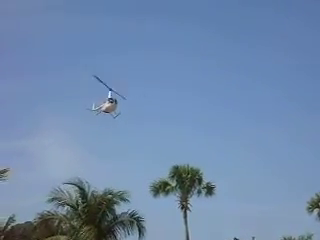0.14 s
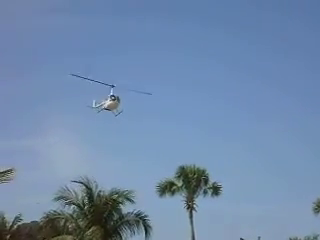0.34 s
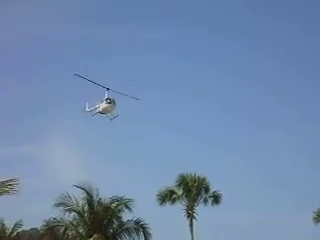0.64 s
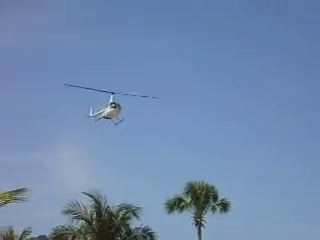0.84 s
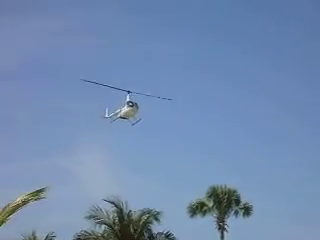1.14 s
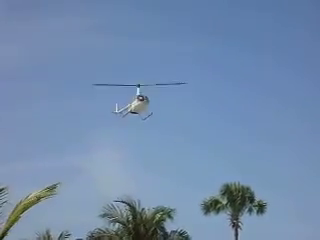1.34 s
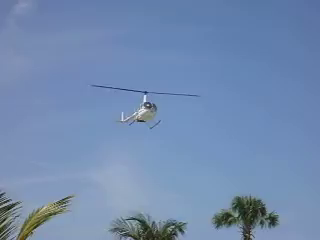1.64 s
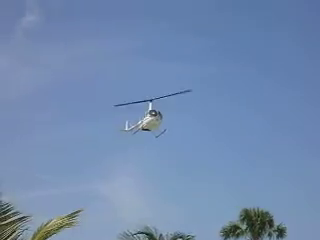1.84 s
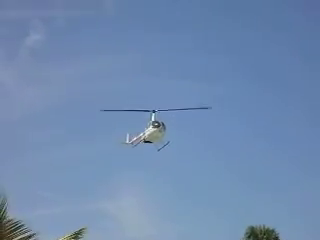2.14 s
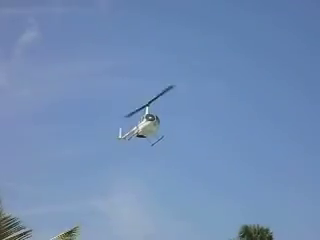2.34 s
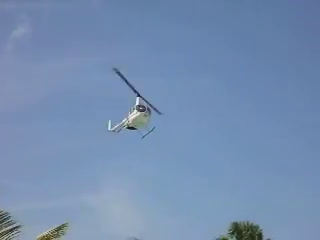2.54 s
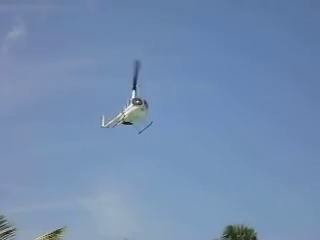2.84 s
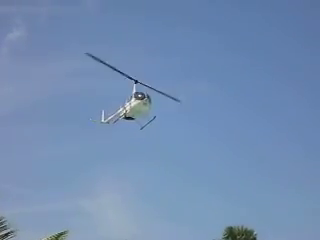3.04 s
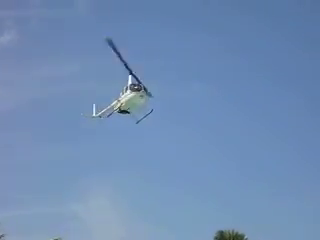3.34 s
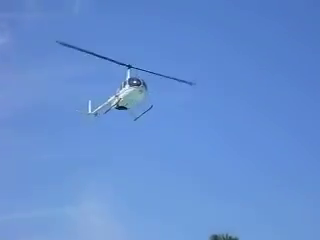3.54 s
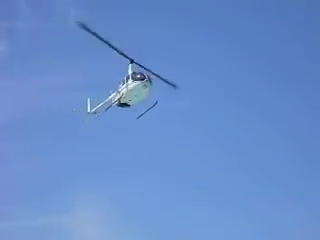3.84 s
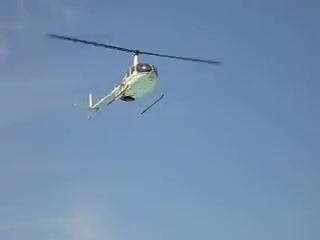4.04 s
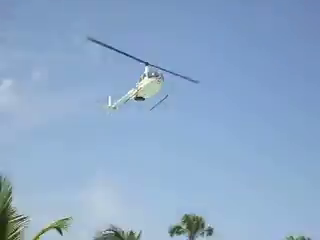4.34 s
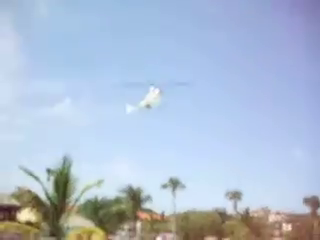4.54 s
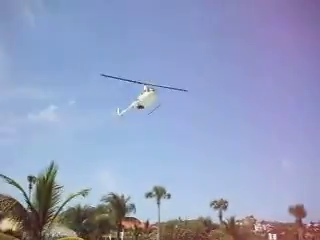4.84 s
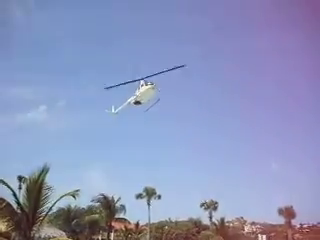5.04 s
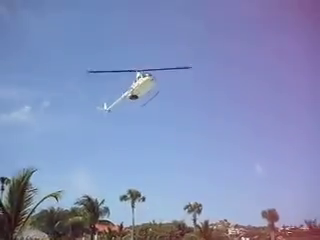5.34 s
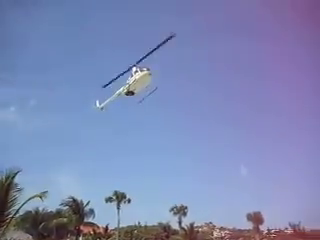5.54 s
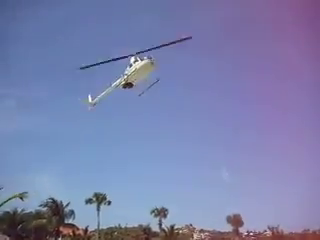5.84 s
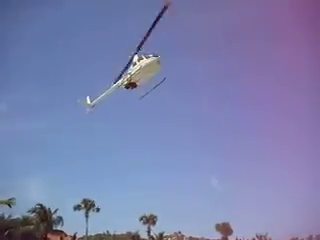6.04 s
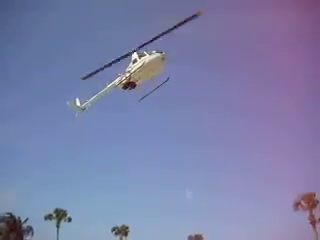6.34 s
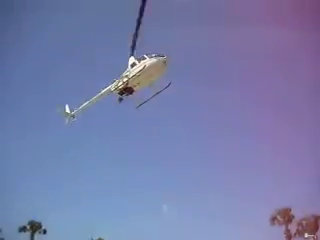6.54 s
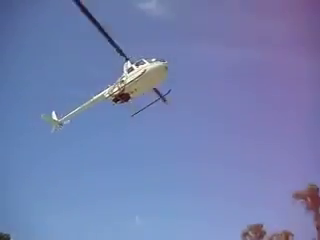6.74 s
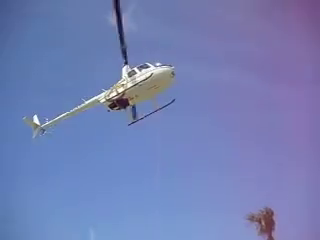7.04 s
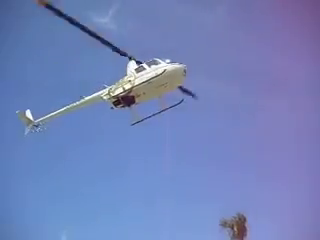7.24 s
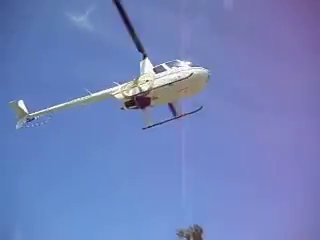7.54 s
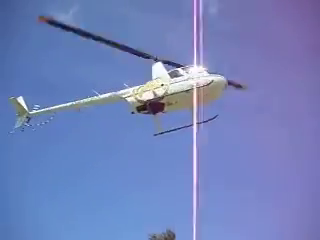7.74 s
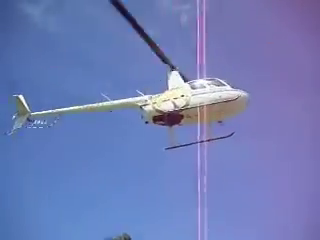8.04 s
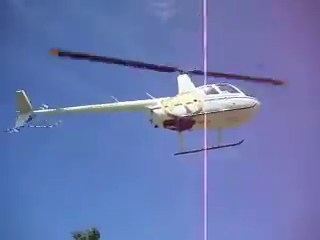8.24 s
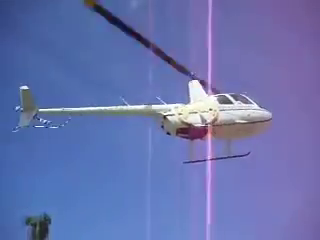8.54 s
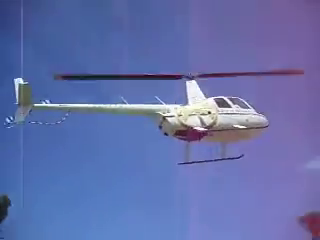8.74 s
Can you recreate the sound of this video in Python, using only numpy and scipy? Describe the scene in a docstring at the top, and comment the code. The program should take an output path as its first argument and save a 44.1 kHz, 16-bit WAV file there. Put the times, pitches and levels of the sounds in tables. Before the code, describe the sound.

A small piston helicopter with a two-blade rotor approaches outdoors. From 0 to 4.2 seconds it is distant: sharp, hollow slaps at a steady fourteen a second, swelling and fading in irregular bursts, each with a short hiss and low thud, over faint wash and tail buzz. Slaps strengthen around 3.3 and 4 seconds, with isolated crackles. From 4.2 to 4.9 there is complete silence. The chop then returns, lower and longer, peaking near 5.4 seconds. From 6 seconds the engine drone near 140 hertz and its octave emerge, sinking slightly, with a raspy tail-rotor buzz and broad rushing wash. From about 6.9 to 8.9 it is loud and overhead: heaving low air, rough swishes, a faint fuzzy gear whine, and frequent brittle crackles as the narrow-band recorder overloads. It ends at full strength, still chopping.

```python
"""A small piston helicopter with a two-blade rotor flies in from far off until it is low overhead.
At a distance each blade slaps the vortices left by the other, in bursts of swings that swell and fade.
At some moments the recorder overloads and crackles; then comes a short silent break.
After it the engine's drone (a firing tone and its octave), the tail rotor's buzz of harmonics and the
noise of the rotor wash grow as the distance shrinks, with more and more crackles."""
import sys
import numpy as np
from scipy.fft import rfft, irfft, next_fast_len
from scipy.io import wavfile
from scipy.ndimage import uniform_filter1d, map_coordinates

SR = 44100
rng = np.random.default_rng(int(sys.argv[2]) if len(sys.argv) > 2 else 0)


def wav_record(signal):
    """Record a signal, one row per channel, as 16-bit PCM in the file named by sys.argv[1]."""
    frames = np.transpose(np.atleast_2d(signal))
    bounded = np.clip(frames, -1, 1)
    # unit amplitude maps onto the largest positive 16-bit level
    quanta = np.round(bounded * 32767).astype(np.int16)
    wavfile.write(sys.argv[1], SR, quanta)


N = 392049

# firing rate of all the cylinders together, sinking as the approach slows: time_s, firing_hz
FIRING_RATE = [(0, 142.7), (4.2, 142.8), (4.9, 141.3), (5.8, 139.4), (6.4, 140.9), (7, 139), (7.5, 138),
               (8, 137.7), (8.89, 137.3)]
CYLINDERS = 6


def amp(db):
    """Decibels to gain."""
    return 10 ** (np.asarray(db) / 20)


def unit(x):
    """x at rms 1."""
    return x / np.sqrt(np.mean(x ** 2) + 1e-20)


def along(points, hz):
    """(Hz, value) points read on a log axis."""
    f, v = np.transpose(points)
    return np.interp(np.log(hz + 1), np.log(f + 1), v)


def curves(rows):
    """One value per sample for each column after the time."""
    s, *cols = np.transpose(rows)
    return [np.interp(np.arange(N) / SR, s, c) for c in cols]


def wobble(rate):
    """A smooth random curve, rate knots a second."""
    knots = rng.standard_normal(int(N * rate / SR) + 4)
    steps = np.arange(0, N, 64)
    coarse = map_coordinates(knots, [steps * rate / SR])
    return np.interp(np.arange(N), steps, coarse)


def filtered(x, response):
    """x times a response of frequency."""
    m = next_fast_len(N + SR // 4)
    return irfft(rfft(x, m) * response(np.fft.rfftfreq(m, 1 / SR)), m)[:N]


def coloured(x, spectrum):
    """x through a (Hz, dB) spectrum."""
    return filtered(x, lambda hz: amp(along(spectrum, hz)))


def noise(spectrum):
    """Noise of rms 1 with the given spectrum."""
    return unit(coloured(rng.standard_normal(N), spectrum))


def around(s, count=2000):
    """Sample indices near a moment, and their times from it."""
    i = np.arange(max(round(s * SR) - count, 0), min(round(s * SR) + count, N))
    return i, i / SR - s


def periodic(turns, orders, gains, size=4096):
    """A wave of rms 1 made of the given multiples of a rotation."""
    angle = np.linspace(0, 2 * np.pi, size + 1)
    phases = rng.uniform(0, 2 * np.pi, (len(orders), 1))
    cycle = gains @ np.sin(np.outer(orders, angle) + phases)
    return np.interp(turns % 1 * 2 * np.pi, angle, unit(cycle))


def over_ground(x, lag, share):
    """The ground returns a later copy, whose lag grows as the helicopter climbs the sky."""
    n = np.arange(N)
    return (x + share * np.interp(n - lag * SR, n, x)) / np.sqrt(1 + share ** 2)


def wash_levels(nearest_m=15.28, rumble_db=-21.5, rush_db=-21.5, hiss_db=-29.5, air_db_per_m=.009):
    """Rumble, rush and hiss (dB) fall with distance, the hiss a little faster as the air absorbs it."""
    # the approach towards the microphone: time_s, distance_m
    distance = [(0.2, 210), (1.2, 147), (2.1, 162), (2.9, 116), (4.1, 83), (5.0, 61.5), (6.1, 43.5),
                (6.6, 41), (7.0, 29.2), (7.5, 24), (7.9, 20.6), (8.8, 15.8)]
    metres, = curves(distance)
    spread_db = -20 * np.log10(metres / nearest_m)
    return rumble_db + spread_db, rush_db + spread_db, hiss_db + spread_db - air_db_per_m * metres


def washes(rumble_db, rush_db, hiss_db, heave_db, puffs):
    """The wash is turbulent noise in three bands, and exhaust puffs ripple through the upper two."""
    # spectra of the low, middle and high wash: freq_hz, relative_level_db
    low_wash = [(15, -25.5), (50, -25.5), (90, -20), (170, -13.5), (240, -5.5), (330, -6), (430, -6),
                (600, -28), (1200, -58), (3000, -120)]
    middle_wash = [(100, -55), (330, -15), (500, -0.5), (680, 2.5), (850, -5.5), (1150, -5.5), (1450, -17),
                   (2200, -32), (6000, -79), (8000, -120)]
    high_wash = [(400, -51), (1400, -10), (1950, 0.5), (2250, -3), (2650, -2.5), (2870, -4), (3300, -8),
                 (3800, -6.5), (5000, -10.5), (6800, -19), (7600, -27), (8150, -33.5), (8600, -78)]
    rumble = amp(heave_db + rumble_db + 1.6 * wobble(8)) * noise(low_wash)
    rush = amp(heave_db + rush_db + 2.3 * wobble(30) + 2.7 * puffs) * noise(middle_wash)
    hiss = amp(hiss_db + 1.7 * wobble(110) + 1.6 * puffs) * noise(high_wash)
    return rumble + rush + hiss


def engine(cycles, overhead, rumble_db, rush_db, firing_gain_db=1.05, octave_gain_db=-2, count=100):
    """Six firings a cycle give the drone; unequal cylinders fill in the other orders."""
    # the exhaust turning towards the listener, ahead of the two gains:
    # time_s, firing_tone_db, octave_db
    exhaust = [(0.2, -63.5, -46), (2, -56, -55), (4, -48.5, -37.5), (5, -44.5, -52.5), (5.5, -35, -49),
               (6.1, -33.5, -44), (6.5, -32, -31.5), (7.3, -27.5, -23), (8, -24.5, -23),
               (8.8, -26.5, -20.5)]
    # colour of the exhaust pipe: freq_hz, relative_level_db
    pipe_colour = [(23, -36), (70, -1.5), (115, -4), (200, -3), (320, 3.5), (460, -7.5), (650, 2.5),
                   (900, -8), (1300, -5.5), (2400, -31.5)]
    # engine orders that stand out: multiple_of_cycle_rate, relative_level_db
    strong_orders = [(14, -7), (18, -5), (27, -5), (29, 2), (33, -6), (37, -6), (39, -5), (47, -11)]
    firing_db, octave_db = curves(exhaust)
    angle = 2 * np.pi * CYLINDERS * cycles
    firing = amp(firing_db + firing_gain_db + wobble(13)) * np.sin(angle)
    octave = amp(octave_db + octave_gain_db + 0.48 * wobble(12)) * np.sin(2 * angle)
    drone = np.sqrt(2) * (firing + octave)

    shaded = 1 - overhead  # the exhaust points away during the approach
    orders = np.arange(1, count)
    last_cycle_hz = FIRING_RATE[-1][1] / CYLINDERS
    uneven = periodic(cycles + 0.0013 * wobble(25), orders, amp(along(pipe_colour, orders * last_cycle_hz)))
    strong, strong_db = np.transpose(strong_orders)
    growl = periodic(cycles + .0015 * wobble(12), strong, amp(strong_db))
    # both follow the distance of the wash
    uneven_db = rumble_db - 4 - 10 * shaded + 1.1 * wobble(7.7)
    growl_db = rush_db - 5.5 - 8 * shaded + wobble(5)
    return drone + amp(uneven_db) * uneven + amp(growl_db) * growl


def tail_rotor(cycles, overhead, rumble_db, gear=3.56, count=24):
    """The geared tail rotor buzzes in harmonics, most of all straight ahead."""
    # harmonics of the buzz, the first row the fundamental: nominal_hz, relative_level_db
    buzz_colour = [(85.5, -11), (170, -7.5), (255, -3.5), (340, -2.5), (425, -12.5), (510, -12.5),
                   (680, -10), (1000, -16), (2000, -34.5)]
    orders = np.arange(1, count)
    sway = .01 * wobble(6)
    gains = amp(along(buzz_colour, orders * buzz_colour[0][0]))
    buzz = periodic(gear * cycles + sway, orders, gains)
    return amp(rumble_db + 2.5 - 7.6 * overhead + wobble(2.6)) * buzz


def blade_passes(overhead, hit_window_s=.03, mismatch_db=.2, far_scatter=.45,
                 jitter_s=.0009, scatter_db=1.7, pitch_scatter=.12):
    """One row (s, slap dB, slap pitch Hz, swish dB) per blade pass, scattered more when overhead."""
    # the stretches in which the rotor is heard: first_pass_s, end_s
    stretches = [(0.047, 4.226), (4.901, 8.89)]
    # blade passes, slower by the end as the machine stops closing in: time_s, passes_per_s
    pass_rate = [(0, 14.195), (1.1, 14.226), (2.6, 14.247), (4.2, 14.23), (4.9, 14.32), (5.87, 14.12),
                 (6.85, 13.995), (7.8, 13.945), (8.89, 13.96)]
    # slapping that swells and fades as the rotor dips in and out of its own wake:
    # time_s, relative_slap_db
    slap_level = [(0.05, -29), (0.65, -22), (0.88, -31.5), (1.04, -19.5), (1.3, -30), (1.42, -17),
                  (1.68, -24), (1.98, -18.5), (2.22, -32), (2.38, -23), (2.62, -24.5), (3.35, -15),
                  (3.54, -19), (3.8, -19.5), (4.1, -15), (4.92, -24.5), (5.4, -12.5), (5.64, -33),
                  (5.88, -16), (6.14, -16), (6.32, -22.5), (6.62, -28.5), (6.8, -16), (7.05, -14.5),
                  (7.58, -22), (7.85, -16.5), (8.45, -15), (8.89, -20.5)]
    # how fast the blade crosses the row of vortices, before scatter: time_s, pitch_hz
    crossing_pitch = [(0, 632), (1.1, 688), (2.5, 608), (3.4, 566), (4.05, 634), (5.0, 581), (5.35, 404),
                      (6.6, 540), (7.3, 454), (8.89, 406)]
    # turbulence shed by the blades: time_s, relative_swish_db
    shed_level = [(0, -40.5), (0.55, -39), (0.95, -34), (1.15, -29.5), (1.7, -36), (2.6, -33), (3.4, -30.5),
                  (4.2, -31), (5.3, -30.5), (5.6, -27.5), (6.05, -30), (6.5, -25.5), (7.55, -28.5),
                  (7.85, -24.5), (8.89, -22.5)]
    # passes that hit a vortex squarely: time_s, extra_slap_db, extra_swish_db
    square_hits = [(0.4, 1, 0), (1.174, 2, 2.5), (1.876, 3, 4), (3.14, 2, -1.5), (3.91, 1.5, 1.5),
                   (5.887, 2, -1), (7.025, 0.5, 3)]
    t = np.arange(N) / SR
    sweep = np.cumsum(curves(pass_rate)[0]) / SR
    slap_db, pitch_hz, swish_db = curves(slap_level) + curves(crossing_pitch) + curves(shed_level)
    hits = np.array(square_hits)
    rows = []
    for first, end in stretches:
        first_turn, end_turn = np.interp([first, end], t, sweep)
        moments = np.interp(np.arange(first_turn, end_turn), sweep, t)
        for k, s in enumerate(moments):
            i = round(s * SR)
            scatter = np.interp(overhead[i], [0, 1], [far_scatter, 1])
            late, harder, higher, rougher = np.clip(rng.standard_normal(4), -2, 2) * scatter
            hit = np.abs(hits[:, 0] - s) < hit_window_s
            # one blade bites harder than the other
            bite_db, shed_db = hits[hit, 1:].sum(axis=0) + mismatch_db * (-1) ** k
            rows.append((s + jitter_s * late,
                         slap_db[i] + bite_db + scatter_db * harder,
                         pitch_hz[i] * np.exp(pitch_scatter * higher),
                         swish_db[i] + shed_db + scatter_db * rougher))
    return [row for row in rows if row[0] < t[-1]]


def slaps(passes, overhead, rise_far=0.00047, rise_near=0.0018, fall_far=0.0014, fall_near=0.0032,
          lead=0.001094, sag=0.17, skew=0.13, slap_db=-2.12, crack_db=30, count=24):
    """A blade cuts a row of tip vortices: a sharp suction, then a few swings; longer from below."""
    # colour of the swings: freq_hz, gain_db
    swing_colour = [(300, -0.5), (600, -1), (720, 2.5), (840, 3), (950, -6.5), (1150, 5.5), (1400, -3.5),
                    (2500, 1.5)]
    # colour of the crack: freq_hz, gain_db
    crack_colour = [(150, -12), (330, 12.5), (700, 0.5), (1100, 12), (1450, -9), (2000, -15.5), (3000, 0),
                    (5000, -5), (6800, -20), (7700, -32), (8500, -88.5)]
    swings, cracks = np.zeros(N), np.zeros(N)
    chance = rng.standard_normal((len(passes), count))
    for (s, db, hz, swish_db), spacing in zip(passes, chance):
        i, t = around(s - lead)
        steep = overhead[round(s * SR)]
        rise = rise_far + steep * (rise_near - rise_far)
        fall = fall_far + steep * (fall_near - fall_far)
        size = np.exp(-np.abs(np.where(t < 0, t / rise, t / fall / 2.2)) ** 2.2)
        # the vortices are unevenly spaced
        drift = np.interp(hz * t, np.arange(count) - count // 2, np.cumsum(spacing))
        uneven = (.34 + .6 * steep) * (drift - np.interp(0, t, drift))
        # older vortices lie further apart, so the swings slow down
        pitch = hz * (1 - sag * np.tanh((t - .0013) / 0.0012))
        turns = np.cumsum(pitch) / SR
        angle = 2 * np.pi * (turns - np.interp(0, t, turns)) + uneven
        slap = -size * (np.cos(angle) - skew * np.sin(2 * angle))
        swings[i] += amp(db + slap_db) * slap / np.sqrt(np.sum(slap ** 2) / (.02 * SR))
        # the first cut steepens into a crack
        cracks[round((s - lead) * SR)] -= amp(swish_db + crack_db - 11 * steep)
    return coloured(swings, swing_colour) + coloured(cracks, crack_colour)


def thuds(passes, overhead, far_hz=275, near_hz=215, width=.0032, delay=0.00091, thud_db=-2,
          thin_above_hz=600, thin_db_per_octave=20):
    """Under each slap the lift of the blade swings once: a low thud, thinner under fast, high slaps."""
    out = np.zeros(N)
    for s, db, slap_hz, _ in passes:
        i, t = around(s + delay)
        hz = far_hz + overhead[round(s * SR)] * (near_hz - far_hz)
        thin_db = thin_db_per_octave * max(np.log2(slap_hz / thin_above_hz), 0)
        swing = np.exp(-(t / width) ** 2) * np.cos(2 * np.pi * hz * t)
        out[i] += amp(db + thud_db - thin_db) * swing
    return out


def swishes(passes, overhead, far_db=3.2, near_db=-0.5, ragged_db=2.5):
    """Turbulence off each blade: a quick burst from afar, a slower swell from below."""
    # spectrum of the shed turbulence: freq_hz, relative_level_db
    swish_colour = [(300, -33), (900, 2), (1500, 1), (2000, 4), (2700, -2), (3400, -8), (5000, -11.5),
                    (6800, -21), (7600, -33.5), (8100, -35), (8500, -65)]
    level = np.zeros(N)
    for s, _, _, db in passes:
        i, t = around(s)
        steep = overhead[round(s * SR)]
        rise, fall = 0.0012 + 0.006 * steep, 0.0065 + 0.0003 * steep
        late = t - .0008
        shape = np.exp(-np.maximum(-late / rise, late / fall))
        level[i] += amp(db + far_db + steep * near_db) * shape
    return level * amp(ragged_db * overhead * wobble(260)) * noise(swish_colour)


def whumps(passes, overhead, width=0.0062, far_db=-16, near_db=1.8):
    """Each slap carries a gust of stirred air, fuller from below."""
    level = np.zeros(N)
    for s, db, *_ in passes:
        i, t = around(s - .001)
        level[i] += amp(db) / (1 + (t / width) ** 2)
    gust = noise([(40, -25.5), (100, -19), (185, 0.0), (290, 6.0), (420, -6.0), (750, 4.0),
                  (1100, -12.5), (1500, -23.0), (5000, -100)])
    return level * amp(far_db + (near_db - far_db) * overhead) * gust


def thumps(passes, width=0.0058, delay=0.004):
    """Each blade shoves the air aside in one slow pulse."""
    push = np.zeros(N)
    for s, *_ in passes:
        i, t = around(s + delay)
        push[i] += 1 / (1 + (t / width) ** 2) ** 2
    return unit(coloured(push, [(5, -46.5), (14, -10), (28, 1), (50, -2.5), (80, 3.5), (200, 5), (600, -36.5)]))


def close_by(overhead, cycles, buffet_db=-17.0, whine_db=-33.0, fade_db=36, whine_order=125):
    """Strongest near the machine: the downwash buffets low, and the gears add a fuzzy whine."""
    downwash = noise([(30, -20.5), (60, -5.5), (84, -3.5), (110, 5.5), (150, -11.0), (400, -60.0)])
    buffet = amp(buffet_db + 2.2 * wobble(5)) * downwash
    # the whine's pitch is a multiple of the engine's cycle rate
    angle = 2 * np.pi * whine_order * cycles + 0.9 * wobble(80)
    whine = amp(whine_db + 2 * wobble(18)) * np.sqrt(2) * np.sin(angle)
    return amp(fade_db * (overhead - 1.5)) * (buffet + whine)


def crackles(buzz_hz=6500, length=0.00027, buzz_db=1.5, dip=0.9, grit_db=-2.5, delay=.0013,
             snap=.00007, snap_db=7):
    """At listed moments the overloaded recorder chatters for a few quick cycles below the midline."""
    # slaps that make the recorder crackle: time_s, relative_level_db
    overloads = [(3.277, -15.5), (3.9792, -12.5), (4.1904, -14.5), (5.8825, -16), (6.8788, -11),
                 (7.0249, -9), (7.0936, -10.5), (7.1641, -14.5), (7.5998, -9), (7.6731, -6.5),
                 (7.7443, -14.5), (8.0274, -11.5), (8.1035, -18.5), (8.1764, -7.5), (8.2442, -12.5),
                 (8.32, -11.5), (8.3822, -12.5), (8.3923, -11), (8.4581, -13.5), (8.527, -8.5),
                 (8.6885, -15), (8.76, -8), (8.8335, -10)]
    out = np.zeros(N)
    for s, db in overloads:
        i, t = around(s + delay)
        burst = np.exp(-np.abs(t / length) ** 3)
        buzz = np.cos(2 * np.pi * buzz_hz * t + rng.uniform(0, 2 * np.pi)) - dip
        out[i] += amp(db + buzz_db) * burst * buzz
        out[i] += amp(db + grit_db) * burst * rng.standard_normal(len(t))
        # the wave snaps back as the overload lets go
        back = (t - length) / snap
        out[i] += amp(db + snap_db) * back * np.exp(-back ** 2)
    return out


def scene():
    """Main rotor, wash, engine and tail rotor on one flight path."""
    # the flight: time_s, overhead (0 low in the sky, 1 above), ground_echo_lag_s, thump_rms_db
    flight = [(0, 0.35, 0.003, -51.5), (2.4, .05, 0.0039, -45), (4.2, 0.4, 0.0045, -44),
              (4.9, 0.5, .0052, -48), (6.3, 0.72, 0.0061, -48), (7.5, 1, .015, -46), (8.89, 1, 0.02, -32.5)]
    overhead, lag, thump_db = curves(flight)
    passes = blade_passes(overhead)
    rumble_db, rush_db, hiss_db = wash_levels()
    cycles = np.cumsum(curves(FIRING_RATE)[0]) / SR / CYLINDERS
    puffs = np.cos(2 * np.pi * CYLINDERS * cycles)
    # from below, the lower wash heaves as each blade sweeps over
    blade = np.interp(np.arange(N) / SR, [row[0] for row in passes], np.arange(len(passes)))
    heave_db = 3.9 * overhead * np.cos(2 * np.pi * (blade - .03))

    wash = washes(rumble_db, rush_db, hiss_db, heave_db, puffs)
    machinery = engine(cycles, overhead, rumble_db, rush_db) + tail_rotor(cycles, overhead, rumble_db)
    chop = slaps(passes, overhead) + thuds(passes, overhead)
    chop += swishes(passes, overhead) + whumps(passes, overhead)
    rotor = over_ground(chop + wash, lag, share=0.22)
    near = amp(heave_db) * close_by(overhead, cycles)
    return (rotor + amp(thump_db) * thumps(passes) + machinery + near)[None]


def record(dry, top=.72, top_hz=16700):
    """The recorder flattens the peaks and has a narrow band; the sound falls silent during the break."""
    # the silent break: start_s, end_s
    silent_break = (4.226, 4.893)
    rounded = dry[0] / (1 + np.abs(dry[0] / top) ** 10) ** (1 / 10)
    chatter = crackles()
    # the chatter takes the place of the wave beneath it
    swamped = np.clip(uniform_filter1d(np.abs(chatter), size=20) / 0.079, 0, 1)
    clipped = np.clip(rounded * (1 - swamped) + chatter, -top, top)
    narrow = coloured(clipped, [(7500, 0), (8400, -10), (16000, -19)])
    t = np.arange(N) / SR
    start_s, end_s = silent_break
    sounding = ((t < start_s) | (t > end_s)).astype(float)
    running = uniform_filter1d(sounding, size=150)  # softens both edges
    return filtered(running * narrow, lambda hz: hz < top_hz)[None]


dry = scene()
out = record(dry)
wav_record(out)
```